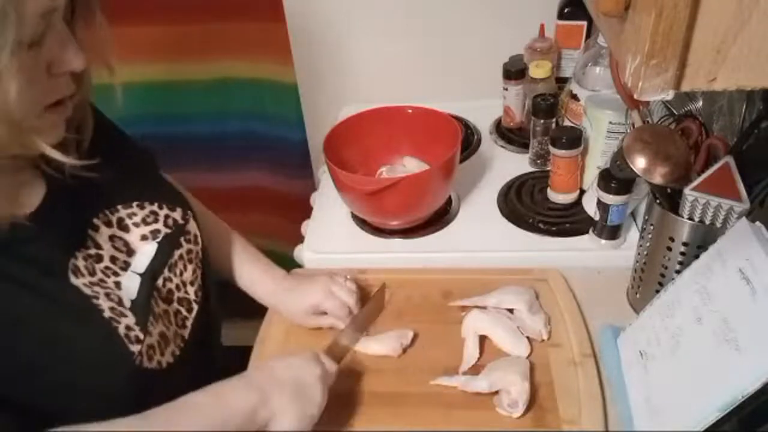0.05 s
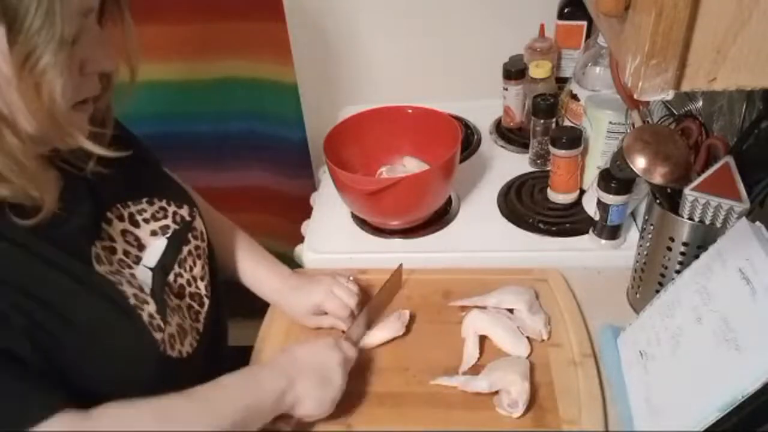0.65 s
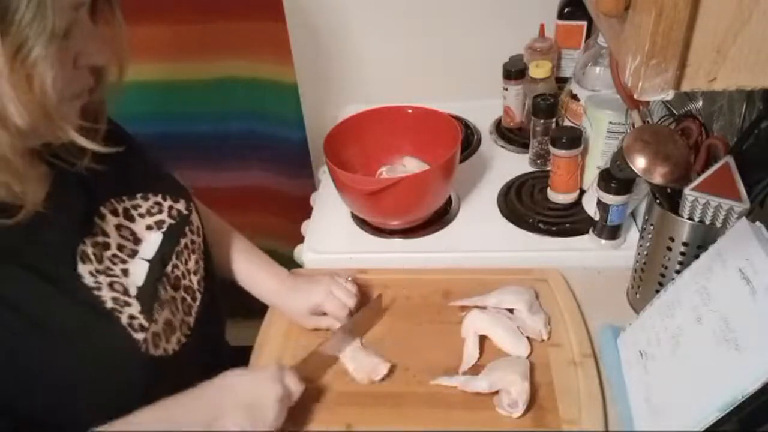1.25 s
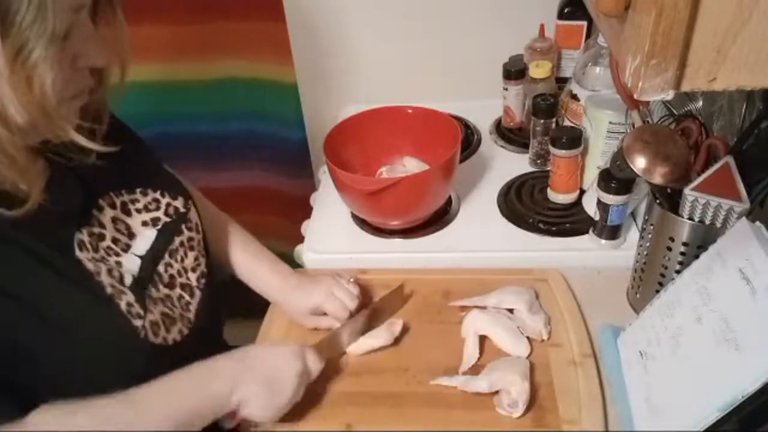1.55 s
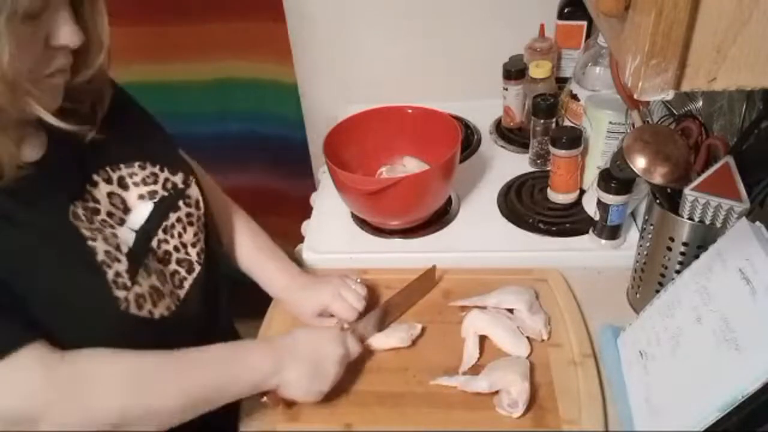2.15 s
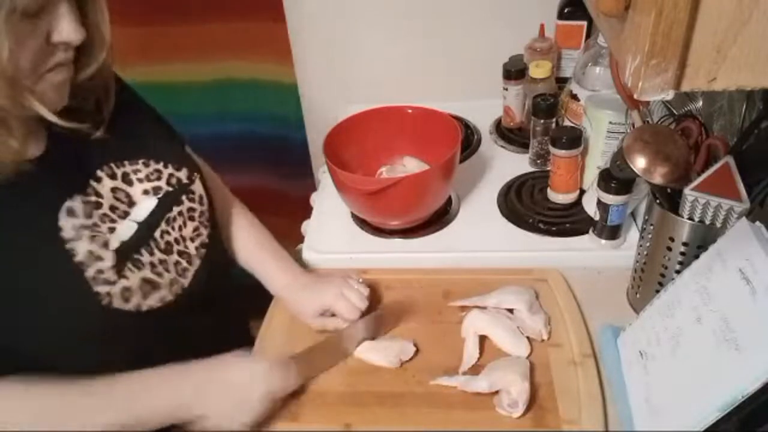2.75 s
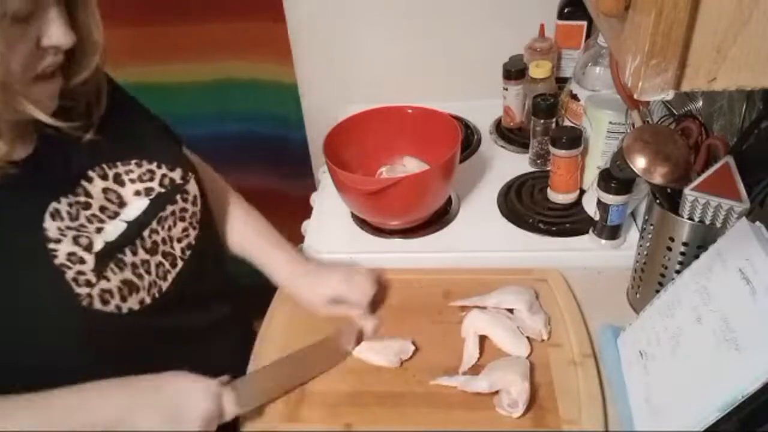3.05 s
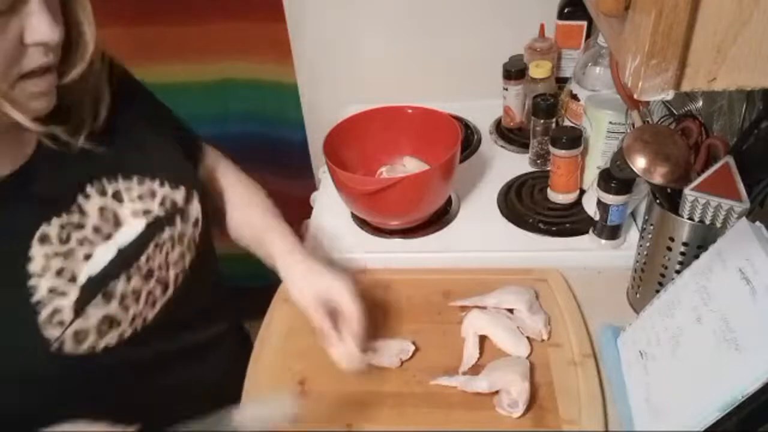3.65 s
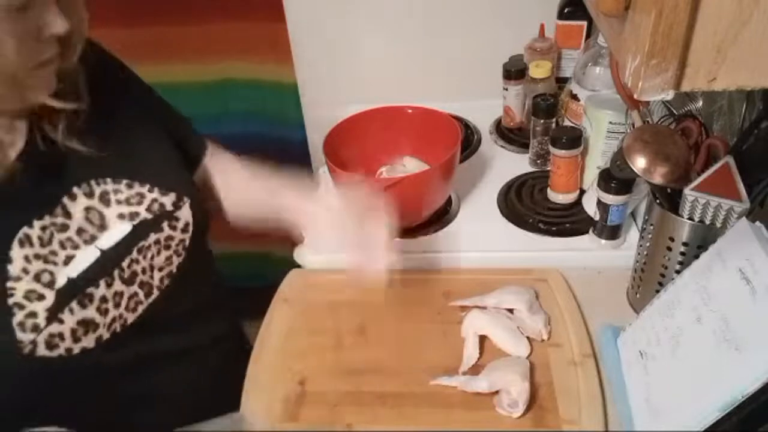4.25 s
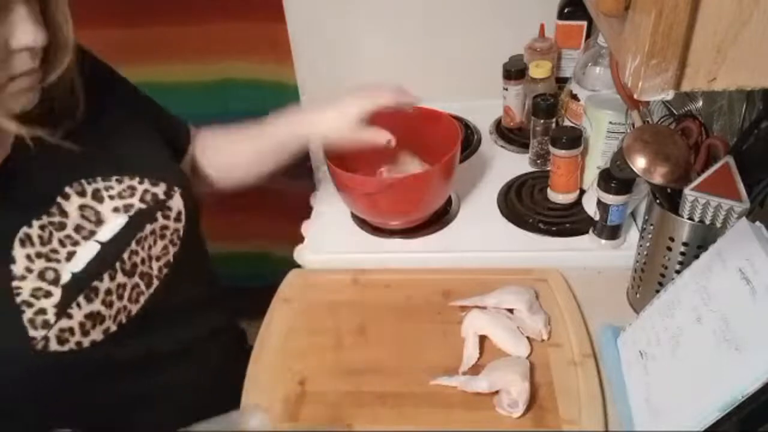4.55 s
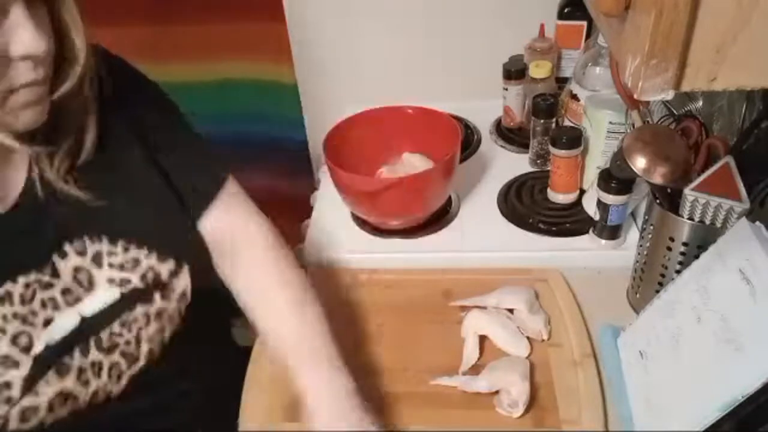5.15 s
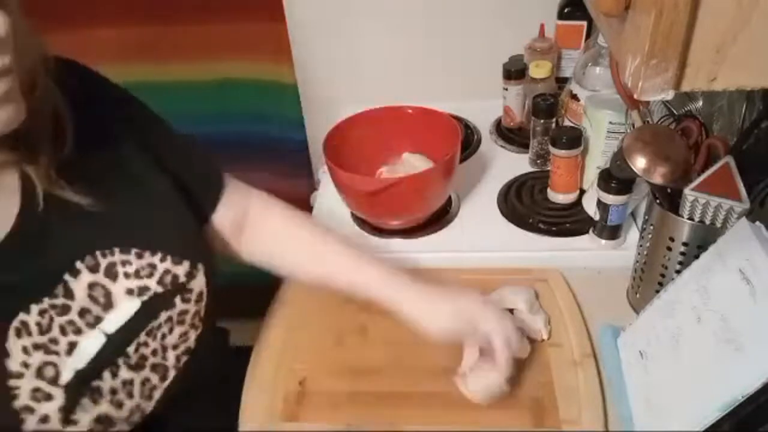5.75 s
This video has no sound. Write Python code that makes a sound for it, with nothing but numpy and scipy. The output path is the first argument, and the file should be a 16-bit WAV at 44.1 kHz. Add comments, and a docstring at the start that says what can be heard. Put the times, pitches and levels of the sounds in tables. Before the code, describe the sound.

A knife cuts raw chicken on a wooden board with crisp gristle snaps and sawing, then a knock, a wet smack and a thud.

```python
"""A small kitchen: a knife parts a raw chicken wing on a wooden board, over a low appliance hum.
Gristle snaps in showers of bursting fibres and skin tears. The edge sticks and slips on the wood,
ringing board and blade: light grazes, brief squeaks and two hard sawing strokes.
The knife is put down with a knock and slides a little; the piece lands with a wet smack,
and a soft, damped thud follows."""
import sys
import numpy as np
from scipy import signal
from scipy.fft import rfft, irfft
from scipy.io import wavfile
from scipy.ndimage import uniform_filter1d

SR = 44100
rng = np.random.default_rng(int(sys.argv[2]) if len(sys.argv) > 2 else 0)


def transcribe(signal):
    """Save signal, clipped to [-1, 1], as a 16-bit WAV file at the path in sys.argv[1]."""
    frames = np.atleast_2d(signal).T
    limited = np.clip(frames, -1, 1)
    pcm = np.round(limited * 32767).astype(np.int16)
    wavfile.write(sys.argv[1], SR, pcm)


N = 259608
TIME = np.arange(N) / SR

# high ring of the thin edge: f/Hz, width/Hz, level/dB
EDGE_RING = [(10300, 61, 2), (11680, 130, 0.5)]
# spectrum of bursting fibres: f/Hz, level/dB
FIBRE_COLOUR = [(500, -19.5), (2000, -28), (5500, -14.5), (8000, -19), (9400, -9), (10500, 0), (11700, -1),
                (12400, -4.5), (15800, -8)]


def undb(db):
    """Decibels to gain."""
    return 10 ** (np.asarray(db) / 20)


def unit(x):
    """Scale to rms 1."""
    return x / np.sqrt(np.mean(x ** 2))


def convolve(x, response):
    """Pass a sound through a response, keeping its length."""
    return signal.fftconvolve(x, response)[:len(x)]


def colour(points, size=4096):
    """Minimum-phase EQ of unit energy through (f/Hz, level/dB) points."""
    hz, db = np.transpose(points)
    bins = np.maximum(np.arange(size // 2 + 1) * SR / size, 1)
    curve_db = np.interp(np.log(bins), np.log(hz), db)
    cepstrum = irfft(np.log(undb(curve_db)))
    cepstrum[1:size // 2] *= 2
    cepstrum[size // 2 + 1:] = 0
    response = irfft(np.exp(rfft(cepstrum)))
    return response / np.linalg.norm(response)


def resonances(peaks):
    """Ringing response of unit energy from (f/Hz, width/Hz, level/dB) peaks."""
    t = TIME[:SR // 4]
    response = sum(undb(db) * width * np.exp(-np.pi * width * t) * np.sin(2 * np.pi * hz * t)
                   for hz, width, db in peaks)
    return response / np.linalg.norm(response)


def walk(rate):
    """Random modulation that glides to a new value `rate` times a second, rms 1."""
    hold = int(SR / rate)
    steps = np.repeat(rng.standard_normal(N // hold + 1), hold)[:N]
    return unit(uniform_filter1d(steps, hold))


def slips(per_s, spread_db):
    """Tiny clicks of uneven size at random moments, rms 1."""
    happens = rng.random(N) < per_s / SR
    polarity = np.sign(rng.standard_normal(N))
    size = undb(spread_db * np.clip(rng.standard_normal(N), -2, 2))
    return unit(happens * polarity * size)


def add(track, at, sound):
    """Mix a sound in, `at` seconds into the track."""
    start = int(at * SR)
    track[start:start + len(sound)] += sound[:N - start]


def kitchen(x, wet_db, t60):
    """Direct sound plus dense reflections from hob, cupboards and walls."""
    t = TIME[:SR // 2]
    onset = np.clip(t / 0.0013 - .3, 0, 1)
    tail = rng.standard_normal(len(t)) * onset * np.exp(-np.log(1000) * t / t60)
    return x + undb(wet_db) * convolve(x, tail / np.linalg.norm(tail))


def background():
    """A bed of room air, wavering appliance hum and thin high hiss."""
    # spectrum of the room air: f/Hz, relative level/dB
    air_colour = [(18, -71), (30, -33.5), (58, -22.5), (68, -14), (90, -4), (149, -20.5), (188, -11.5),
                  (279, -15.5), (335, -10), (537, -17.5), (596, -19.5), (5120, -40.5), (7780, -45.5),
                  (10700, -45.5), (15800, -37.5)]
    # motor and mains hum: f/Hz, rms level/dB
    hum_tones = [(91.6, -70.5), (119.5, -81)]
    # the bed dips briefly: t/s, gain/dB
    dip = [(4.685, 0), (4.715, -18), (4.735, -22), (4.75, 0)]
    swell = undb(.7 * walk(5))
    waver = undb(2.5 * walk(6))
    air = swell * undb(-67.5) * convolve(rng.standard_normal(N), colour(air_colour))
    hum = np.zeros(N)
    for hz, db in hum_tones:
        cycles = np.cumsum(hz + 1.3 * walk(6)) / SR
        hum += waver * undb(db) * np.sqrt(2) * np.sin(2 * np.pi * cycles)
    hiss = swell * undb(-86.5) * convolve(rng.standard_normal(N), resonances([(10830, 580, 0)]))
    return (air + hum + hiss) * undb(np.interp(TIME, *np.transpose(dip)))


def thuds():
    """Damped bumps that rebound once, lower; the pitch wanders as the meat yields, dulling slow ones."""
    # hand, meat and board: t/s, f/Hz, peak level/dB, swell/s, rebound re peak/dB
    bumps = [(0.57, 247, -40, 0.0036, -16.5), (0.73, 221, -53, 0.0032, -1), (1.495, 336, -54.5, 0.013, -16),
             (1.783, 119, -50, 0.0062, -0.5), (2.037, 119.4, -48, 0.0046, 1.5),
             (2.406, 253, -46.5, 0.019, -15), (2.493, 398, -37, 0.0095, -19),
             (3.025, 224, -54.5, 0.017, -19), (3.575, 226, -28.5, 0.0016, -17.5),
             (3.774, 255.5, -54, 0.016, -7), (4.431, 126, -57.5, 0.015, -10.5),
             (5.0, 175, -26.5, 0.0046, -6.5)]
    rebound_s, rebound_pitch = 0.022, 0.73
    out = np.zeros(N)
    t = TIME[:SR // 4]
    yielding = .25 * walk(220)
    for at, hz, db, swell, rebound_db in bumps:
        start = int(at * SR)
        bend = yielding[start:start + len(t)] * np.minimum(t / 0.051, 1)
        cycles = hz * np.cumsum(1 + bend) / SR
        bump = undb(db) * t / swell * np.exp(1 - t / swell) * np.sin(2 * np.pi * cycles)
        add(out, at, bump)
        add(out, at + rebound_s, undb(rebound_db) * np.interp(t * rebound_pitch, t, bump))
    return kitchen(out, wet_db=-7, t60=0.22)


def squeaks():
    """Friction catches on one resonance for a moment: uneven slips keep it ringing roughly."""
    # steel or skin sticking and slipping: centre t/s, f/Hz, level/dB, half-length/s
    catches = [(0.003, 642, -57, 0.1), (0.366, 1927, -62.5, 0.09), (0.584, 564, -43, 0.031),
               (0.644, 5960, -66, 0.021), (0.715, 3190, -58, 0.032), (0.783, 750, -59, 0.17),
               (1.227, 1953, -67.5, 0.052), (1.323, 1947, -66.5, 0.03), (1.389, 1934, -64, 0.026),
               (1.498, 1940, -65, 0.029), (2.33, 2920, -46.5, 0.13), (2.541, 2926, -41.5, 0.076),
               (2.575, 1797, -37.5, 0.047), (2.732, 1946, -50.5, 0.16), (3.128, 1450, -61.5, 0.036),
               (3.817, 6540, -60.5, 0.012), (3.836, 2734, -52.5, 0.034)]
    out = np.zeros(N)
    warped_time = np.cumsum(1 + .022 * walk(500)) / SR  # jitters the pitch
    roughness = unit(1 + .5 * walk(130) + .45 * walk(700))
    for at, hz, db, half_length in catches:
        near = np.abs(TIME - at) < half_length
        swell = np.cos(np.pi / 2 * (TIME[near] - at) / half_length) ** 4
        out[near] += undb(db) * swell * roughness[near] * np.sin(2 * np.pi * hz * warped_time[near])
    return kitchen(out, wet_db=-6.5, t60=0.13)


def knocks():
    """The knife hits the board: a woody crack and the board's ring; a longer contact is duller."""
    # knife on board: t/s, relative level/dB, contact/s
    hits = [(0.57, -16, 0.00033), (2.487, -23, 0.00022), (3.577, 2.5, 0.00005)]
    # modes of the struck board: f/Hz, relative level/dB, t60/s
    board_modes = [(138, -7.5, 0.19), (257.4, -17, 0.15), (326.8, -13.5, 0.29), (561, -10, 0.44),
                   (621, -18.5, 0.41), (675.4, -7.5, 0.2), (764, -0.5, 0.082), (1150, -1.5, 0.14),
                   (1197, -3, 0.16), (1370, -19, 0.15), (1465, -3.5, 0.13), (1730, -12, 0.14),
                   (1970, -23, 0.23), (2460, -10.5, 0.064), (2570, -15, 0.1), (2570, -20, 0.11)]
    # spectrum of the woody crack: f/Hz, level/dB
    crack_colour = [(59, -51), (100, -11.5), (343, -12), (424, -28.5), (634, -1), (872, -20.5), (1390, -16),
                    (2000, -29), (2580, -35), (3400, -50), (5650, -36.5), (7770, -46.5), (13800, -36),
                    (16000, -52)]
    force = np.zeros(N)
    t = TIME[:SR // 2]
    for at, db, contact in hits:
        push = t * np.exp(-t / contact)
        add(force, at, undb(db) * push / push.sum())
    ring = sum(undb(db) * np.exp(-np.log(1000) * t / t60) * np.sin(2 * np.pi * (hz * t + rng.random()))
               for hz, db, t60 in board_modes)
    ring *= 1 - np.exp(-t / 0.019)  # the ring builds as waves cross the board
    crack = kitchen(convolve(force, colour(crack_colour)), wet_db=4.5, t60=0.18)
    return undb(-3) * crack + undb(-26.5) * convolve(force, ring)


def snaps():
    """Each snap is a shower of bursting fibres, with a smack from the wet pocket that opens. The same bursts
    also make the brief rattle of the knife edge when it knocks the board."""
    # gristle, skin and meat snapping, plus the knife edge rattling as it knocks the board (0.571 s, 3.574 s):
    # t/s, crackle level/dB, smack level/dB, smack f/Hz, decay/s, strain/s
    wet_snaps = [(0.364, -73, -74, 4340, 0.052, 0.003), (0.571, -84, -64, 1980, 0.025, 0.001),
                 (0.619, -62.5, -71, 5170, 0.045, 0.0034), (1.161, -55, -87, 5500, 0.0077, 0.0036),
                 (1.214, -74, -63.5, 3600, 0.004, 0.002), (1.756, -17.5, -44, 2980, 0.002, 0.02),
                 (1.921, -38, -50.5, 2670, 0.0074, 0.0016), (2.025, -29, -52.5, 2600, 0.015, 0.0065),
                 (2.233, -48, -56, 6650, 0.0064, 0.0026), (3.574, -55.5, -46, 2750, 0.01, 0.003),
                 (3.769, -60, -52, 2100, 0.0056, 0.0011), (3.923, -46.5, -88, 5500, 0.0036, 0.002),
                 (4.386, -47, -52, 5370, 0.031, 0.0043), (4.416, -57.5, -37.5, 2200, 0.0095, 0.0062),
                 (4.429, -90, -56, 837, 0.017, 0.0022), (4.509, -93.5, -66.5, 4430, 0.02, 0.006),
                 (4.997, -40.5, -43.5, 6260, 0.0032, 0.00086), (5.048, -64, -62.5, 2360, 0.012, 0.001),
                 (5.763, -70.5, -77.5, 5450, 0.064, 0.003)]
    crackle_gain, smack = np.zeros(N), np.zeros(N)
    lead_s = .03
    t = TIME[:SR // 4] - lead_s
    after = np.maximum(t, 0)
    for at, crackle_db, smack_db, hz, decay, strain_s in wet_snaps:
        creak = undb(-18) * np.exp(-np.abs(t) / strain_s)  # gristle strains before and after it parts
        parting = np.exp(-after / decay) * (1 - np.exp(-after / 0.0013))
        envelope = np.hypot(creak, parting)
        pocket = signal.butter(2, [hz / 1.38, hz * 1.244], "band", fs=SR, output="sos")
        squelch = unit(signal.sosfilt(pocket, rng.standard_normal(len(t))))
        add(crackle_gain, at - lead_s, undb(crackle_db) * envelope)
        add(smack, at - lead_s, undb(smack_db) * envelope * squelch)
    clumps = unit(undb(3 * walk(450)))  # fibres break in bundles
    bursts = crackle_gain * clumps * slips(9000, spread_db=5.2)
    crackle = convolve(bursts, colour(FIBRE_COLOUR))
    edge = undb(-12.5) * convolve(bursts, resonances(EDGE_RING))
    return kitchen(crackle + edge + smack * clumps, wet_db=-4.5, t60=0.16)


def effort(start, attack, length, release_db_per_s=334.5):
    """Envelope of one push: the hand leans in, holds to the end of its length and lets go."""
    t = TIME - start
    return np.clip(t / attack, 0, 1) ** 2 * undb(-release_db_per_s * np.maximum(t - length, 0))


def travelling(friction, peaks, shift_db=4, shifts_per_s=23):
    """The contact point travels and favours one resonance after another at random, rms 1."""
    ring = np.zeros(N)
    for hz, width, db in peaks:
        gain = undb(db + shift_db * np.clip(walk(shifts_per_s), -1.5, 1.5))
        ring += gain * np.sqrt(width) * convolve(friction, resonances([(hz, width, 0)]))
    return unit(ring)


def cutting():
    """The edge sticks and slips on the wood, ringing board and blade, while skin fibres tear."""
    # light grazes to hard sawing: t/s, length/s, board level/dB, blade level/dB
    strokes = [(0.673, 0.11, -66.5, -73), (1.318, 0.2, -78, -76), (1.705, 0.091, -60.5, -63),
               (1.889, 0.11, -73, -59.5), (1.976, 0.067, -58, -53.5), (2.103, 0.073, -77.5, -73.5),
               (2.219, 0.18, -41, -49.5), (2.438, 0.19, -39, -46.5), (2.651, 0.12, -53, -58),
               (2.845, 0.3, -75.5, -77), (3.74, 0.081, -64, -57.5)]
    # skin stretching and tearing under the edge: t/s, swell/s, length/s, level/dB
    tears = [(0.602, 0.024, 0.32, -80.5), (1.288, 0.11, 0.23, -73), (1.925, 0.11, 0.11, -51.5),
             (2.1, 0.02, 0.063, -68), (2.247, 0.11, 0.12, -40), (2.444, 0.044, 0.21, -46.5),
             (2.662, 0.076, 0.088, -58.5), (2.868, 0.042, 0.14, -76), (3.764, 0.021, 0.11, -71)]
    # resonances of the board under the blade: f/Hz, width/Hz, level/dB
    board_peaks = [(696, 19, -10), (756.7, 22, 5.5), (877, 13, -14), (1207, 18, -7.5), (1485, 31, -11)]
    # resonances of the pressed blade: f/Hz, width/Hz, level/dB
    blade_peaks = [(1837, 21, -11), (1928, 25, 0), (2760, 43, -8.5), (2880, 41, -9)]
    # spectrum of the woody rasp: f/Hz, level/dB
    wood_colour = [(150, -44.5), (450, -5), (800, 8.5), (1400, -8), (2500, -23), (6000, -38)]
    # spectrum of the steely scrape: f/Hz, level/dB
    steel_colour = [(900, -22.5), (1800, 11), (3100, -13), (3600, -1.5), (6500, -6), (8000, -40),
                    (16000, -30.5)]
    board_gain, blade_gain = sum(np.outer(undb(levels), effort(at, attack=0.056, length=length))
                                 for at, length, *levels in strokes)
    skin_gain = sum(undb(db) * effort(at, swell, length) for at, swell, length, db in tears)
    grip = undb(walk(110) + 1.36 * walk(40.06))  # the edge catches and lets go
    releases = slips(3500, spread_db=4.4) * grip
    friction = unit(np.diff(releases, prepend=0))  # each release is a sudden change of force
    board_ring = travelling(friction, board_peaks)
    rasp = convolve(slips(3000, spread_db=8.1) * grip, colour(wood_colour))
    board = unit(board_ring + undb(-2.5) * rasp)
    blade_ring = travelling(friction, blade_peaks)
    scrape = convolve(slips(3000, spread_db=4.4) * grip, colour(steel_colour))
    blade = unit(blade_ring + undb(3) * scrape)
    fibres = slips(2200, spread_db=4) * grip
    plucks = slips(400, spread_db=3.7) * grip  # the toughest fibres pluck the edge
    skin = unit(convolve(fibres, colour(FIBRE_COLOUR)) + undb(-8) * travelling(plucks, EDGE_RING))
    return kitchen(board * board_gain + blade * blade_gain + skin * skin_gain, wet_db=-6.5, t60=0.055)


def scene():
    """Knife work and room bed, mixed to mono."""
    return (cutting() + squeaks() + snaps() + knocks() + thuds() + background())[None]


def record(dry):
    """The microphone loses the deep bass; the top is cut steeply."""
    low_cut = signal.butter(2, 55, "high", fs=SR, output="sos")
    high_cut = signal.ellip(10, .2, 80, 15900, fs=SR, output="sos")
    return signal.sosfilt(high_cut, signal.sosfilt(low_cut, dry))


dry = scene()
out = record(dry)
transcribe(out)
```